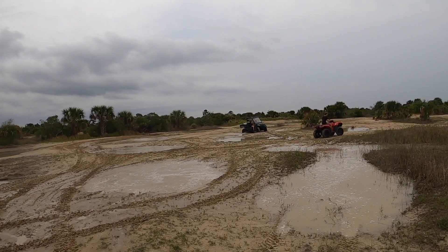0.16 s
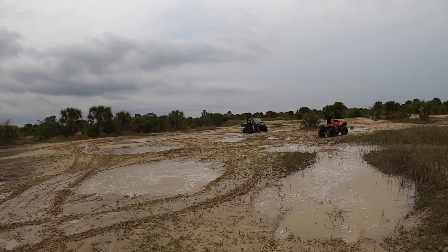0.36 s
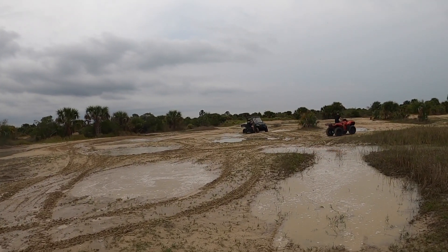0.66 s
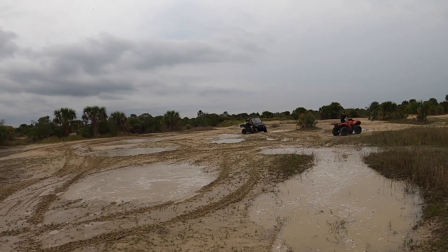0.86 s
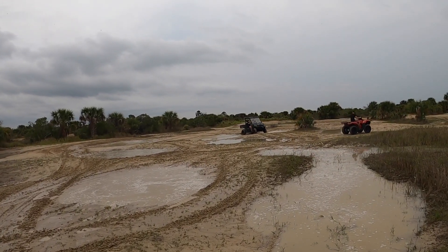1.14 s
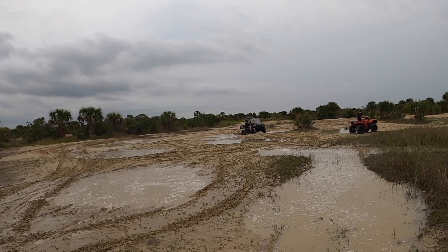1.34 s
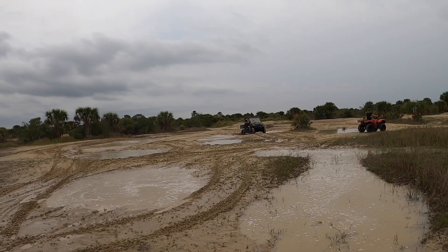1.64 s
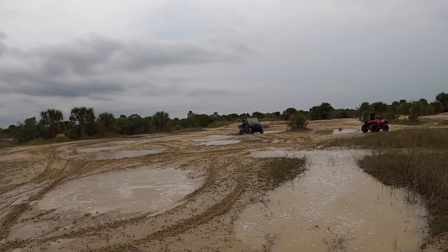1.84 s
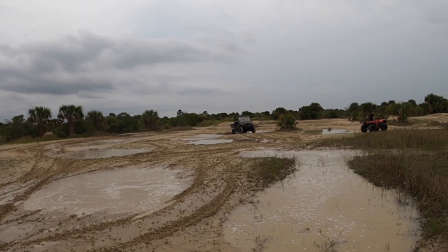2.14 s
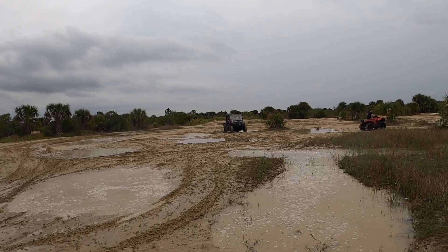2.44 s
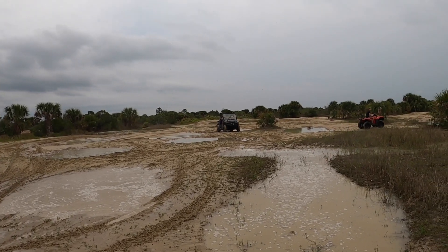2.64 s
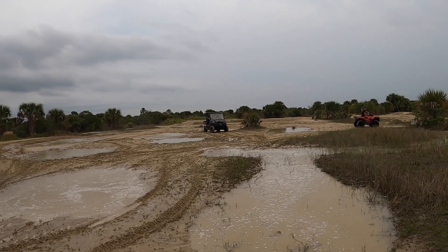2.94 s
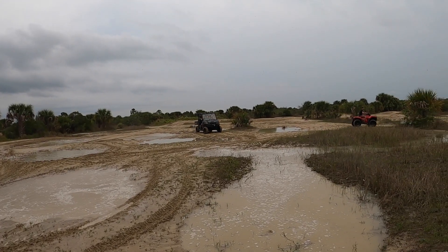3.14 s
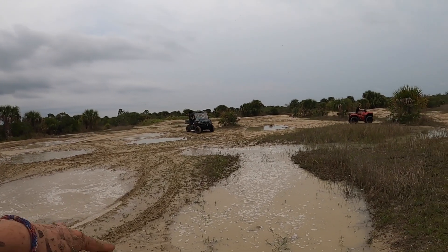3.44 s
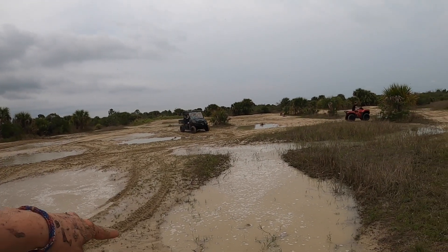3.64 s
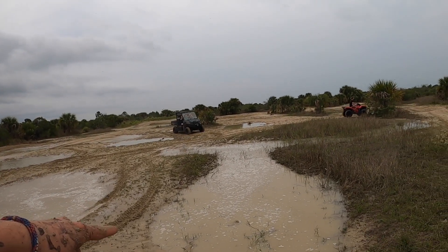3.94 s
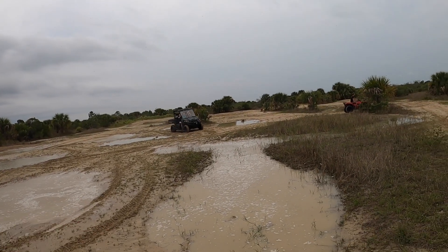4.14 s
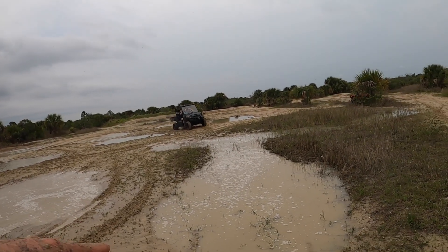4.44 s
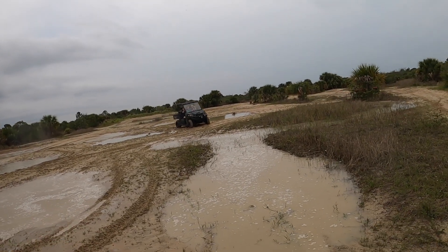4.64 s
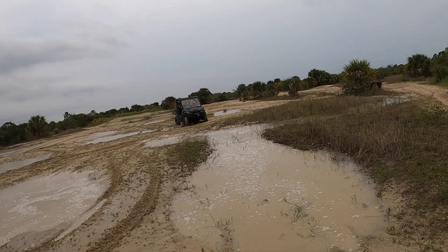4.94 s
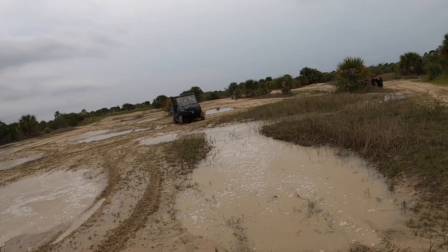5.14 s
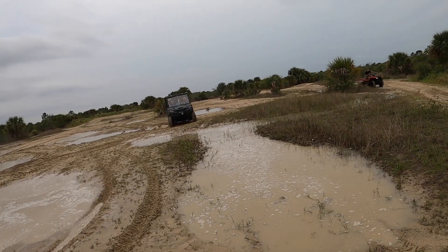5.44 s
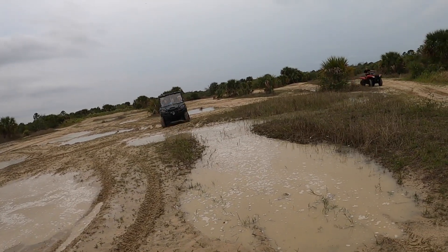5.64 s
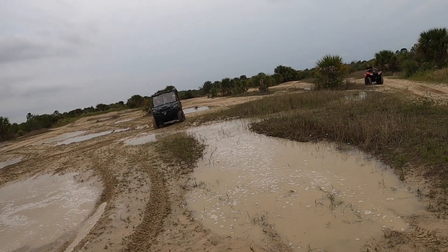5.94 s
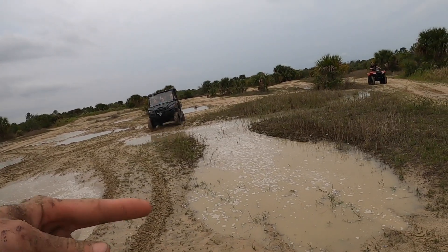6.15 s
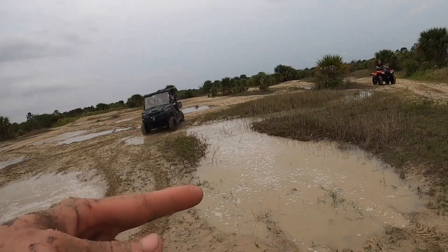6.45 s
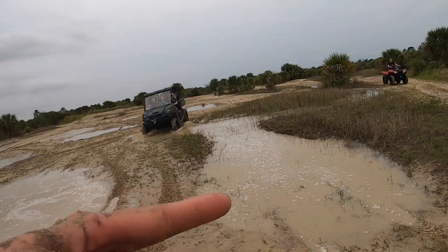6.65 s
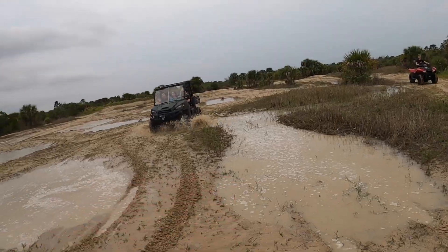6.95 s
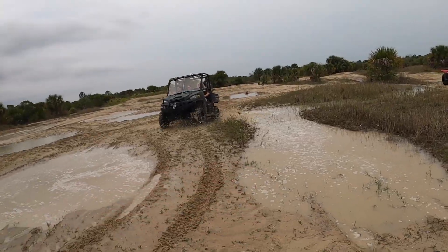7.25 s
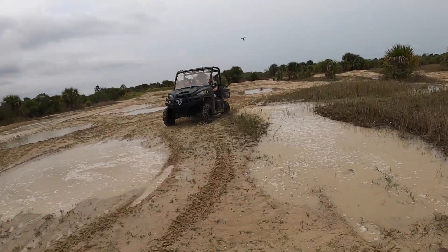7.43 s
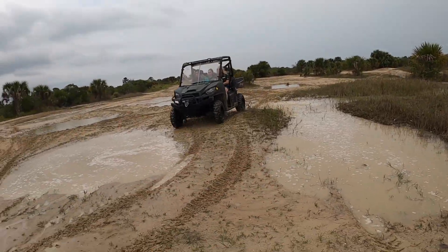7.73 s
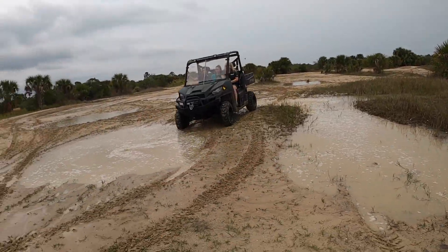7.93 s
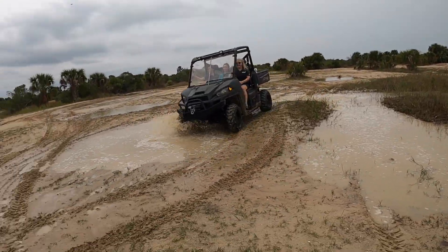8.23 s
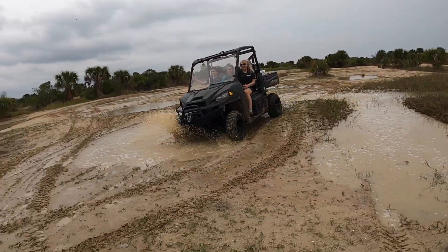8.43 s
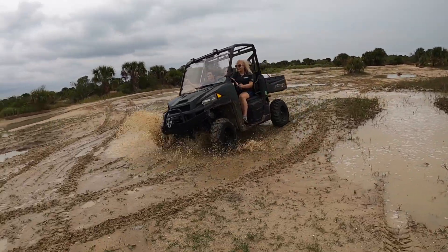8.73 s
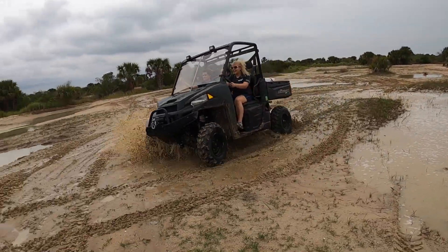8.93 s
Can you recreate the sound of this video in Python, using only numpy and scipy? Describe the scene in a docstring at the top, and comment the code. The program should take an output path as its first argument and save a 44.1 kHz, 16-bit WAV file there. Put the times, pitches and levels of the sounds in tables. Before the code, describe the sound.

A quad chugs away over wet sand while a buggy engine revs up and down, drives in and splashes a puddle, wind buffeting.

```python
"""Two off-road vehicles on windy wet sand

A single-cylinder quad chuffs away while a twin-cylinder buggy revs closer and ploughs a puddle.
Firing pulses and gas noise excite pipe resonances; filtered noise gives intake roar, spray and wind.
Wind buffets, thumps and whistles at a small hand-held housing, and a few knocks ring its shell.
The housing filters the buggy and the quad's chuff; two microphone ports then hear the whole scene.
"""
import sys
import numpy as np
from scipy import signal
from scipy.fft import rfft, irfft
from scipy.io import wavfile
from scipy.ndimage import uniform_filter1d

SR = 44100
rng = np.random.default_rng(int(sys.argv[2]) if len(sys.argv) > 2 else 0)


def pcm_store(signal):
    """Save signal as 16-bit PCM."""
    levels = np.round(np.clip(np.atleast_2d(signal), -1, 1) * 32767)
    wavfile.write(sys.argv[1], SR, levels.astype(np.int16).T)


N = 400648
MARGIN = 4096  # samples of run-in and run-out for the filters
SIZE = N + 2 * MARGIN
TIME = np.arange(N) / SR  # s
BINS = np.arange(SIZE // 2 + 1) * SR / SIZE + 1e-9  # Hz, kept above zero for the logarithm


def quad():
    """Pulse excitation: regular firings boom in the silencer; a sharp, uneven chuff of gas follows each."""
    # engine speed: t/s, firing rate f/Hz
    firing_rate = [(0.0, 19.28), (0.38, 20.11), (0.6, 24.47), (1.1, 26.84), (1.45, 24.74), (1.95, 23.77),
                   (2.13, 20.73), (2.4, 26.38), (2.55, 25.04), (2.85, 27.02), (3.22, 19.54), (3.45, 19.22),
                   (3.62, 22.79), (4.0, 23.15), (4.35, 27.02), (4.7, 27.56), (5.35, 37.12), (5.85, 40.27),
                   (6.3, 29.32), (6.95, 25.35), (7.3, 27.53), (7.65, 21.94), (9.08, 23.05)]
    # quad as heard, the chuff loudest while its tail pipe points this way:
    # t/s, exhaust level/dB, chuff level/dB
    heard_level = [(0, -38, -68.5), (.5, -34.5, -52.5), (.8, -33.5, -52.5), (1.15, -36, -58.5),
                   (1.9, -38.5, -76), (2.12, -40.5, -61.5), (2.45, -37.5, -53.5), (3.05, -37.5, -57),
                   (3.33, -39.5, -54.5), (3.5, -41, -64), (3.8, -39, -56), (4.1, -36, -54.5),
                   (4.5, -41, -57.5), (5.5, -52, -71), (6.35, -33, -71.5), (6.9, -36.5, -71.5),
                   (7.7, -50.5, -79), (9.08, -33, -81)]
    # exhaust resonances: f/Hz, width/Hz, relative level/dB
    silencer_modes = [(95, 34, -3.5), (127.5, 26.8, 9), (202, 91, -9.5), (261, 41, -18), (393, 150, -24)]
    # tail pipe resonances in the chuff: f/Hz, width/Hz, relative level/dB
    chuff_modes = [(1054, 290, -3), (1480, 240, -4), (2460, 340, 5.5), (3150, 120, 7.5), (3665, 180, 19.5)]
    body_db, thinning_db_per_s = -15.5, 3.5  # lower part of the chuff, lost as the quad drives off

    pulses, phase, size = firing(curves(firing_rate)[0], .79, .003, .7)
    puff = size * (1 - np.exp(-phase / .035)) * np.exp(-phase / .16)  # rise and decay in cycles
    gas = air_noise()
    body = undb(body_db - thinning_db_per_s * TIME) * pipe(gas, chuff_modes)
    jet = band(band(gas, 4800., 9100.), 2600., 6400.)
    chuff = housing(puff * (jet + body))
    boom_db, chuff_db = curves(heard_level)
    return undb(boom_db) * unit(pipe(pulses, silencer_modes)) + undb(chuff_db) * unit(chuff)


def buggy():
    """Distance law: exhaust, main roar and spray follow load and gain 6 dB per halving of distance."""
    # engine: t/s, firing rate f/Hz, load level/dB
    engine = [(0, 28.66, -3.5), (.12, 29.16, -2), (.3, 29.4, -11.5), (.6, 30.7, -5.5), (.93, 31.55, -10),
              (1.31, 35.65, -12.5), (1.53, 39.26, -5), (1.74, 42.1, -5), (1.95, 51.05, 1.5),
              (2.1, 52.94, 4), (2.2, 50.9, -0.5), (2.45, 43.3, -3), (2.73, 34.36, -4.5),
              (3.06, 33.62, -12.5), (3.36, 29.7, -11), (3.55, 30.5, -10.5), (3.77, 34.7, -8.5),
              (4.05, 37.8, -7.5), (4.22, 40.9, -3), (4.47, 42.42, -5.5), (4.68, 40.9, -1.5),
              (4.86, 40.06, -10.5), (5.34, 37.54, -13), (5.7, 40.13, -13), (6.07, 41.48, -11.5),
              (6.45, 44.89, -6), (6.88, 43.64, -5), (7.05, 39.84, -10.5), (7.43, 35.02, -4),
              (7.66, 35.64, -20.5), (7.88, 32.24, -17), (8.04, 29.08, -21.5), (8.22, 30.04, -7),
              (8.5, 34.54, -5), (8.98, 39.25, -6), (9.08, 39.4, -13.5)]
    # circling far off, then driving in: t/s, distance/m
    path = [(0, 33.7), (2, 31.9), (3.3, 36), (5, 32.9), (6.4, 18.2), (7.6, 11.55), (8.3, 12.74),
            (9.08, 7.3)]
    second_turns, second_db = .24, -3  # second cylinder fires this share of a cycle after the first

    hz, load_db = curves(engine)
    near_db = 20 * np.log10(10 / curves(path)[0])  # relative to ten metres
    hiss_db = -45 + near_db + .33 * load_db
    pulses, phase, size = firing(hz, 0, .003, .8)
    second = np.diff(1. * (phase > second_turns), prepend=0).clip(0)
    pulses = pulses + undb(second_db) * size * second
    whine, roar = intake(hz, near_db + load_db, pulses, phase, size)
    return exhaust(pulses, near_db, load_db, hiss_db) + roar + whine + spray(hiss_db)


def exhaust(pulses, near_db, load_db, hiss_db):
    """Resonance: paired firings boom in the exhaust, bark in the tail pipe and ring the silencer shell."""
    # exhaust resonances: f/Hz, width/Hz, relative level/dB
    boom_modes = [(116, 89, 1), (187.4, 73, 5), (251, 58, 1.5), (308.5, 46.5, -1.5)]
    # swell above or below the load rule: t/s, low boom level/dB, tail pipe bark level/dB
    swell_table = [(0, 1, -16.5), (.9, -3.5, -4.5), (1.4, -11, 5), (2.1, 6, -1.5), (2.5, -11.5, 0.5),
                   (3.3, -1.5, -6), (3.9, 0.5, -2), (4.45, -5.5, 1.5), (4.9, 2.5, 2), (5.3, 2.5, 2.5),
                   (5.8, 0.5, -0.5), (6.5, 5.5, -2.5), (7, 2.5, -2), (7.7, -4, -16.5), (8.3, 3.5, -3),
                   (9, -2.5, 3.5)]
    # silencer shell's ring ahead of the housing: t/s, level/dB
    ring_level = [(0, -55), (.5, -70), (1.3, -56.5), (1.6, -53.5), (2.4, -53), (3, -49), (3.45, -56),
                  (3.8, -49), (4.7, -55), (5.3, -62), (5.9, -67.5), (6.35, -49), (7, -60), (7.43, -47),
                  (7.9, -56.5), (8.45, -44.5), (9.08, -58)]

    boom_swell_db, bark_swell_db = curves(swell_table)
    boom_db = -39 + near_db + .13 * load_db + boom_swell_db
    bark_db = -41.5 + near_db + .76 * load_db + bark_swell_db
    # mud and water roughen the exhaust, more so as the spray grows
    gas = unit(pulses) + (.1 + undb(hiss_db + 43)) * air_noise()
    rattle = undb(1.5 * walk(15)) * (gas + .3 * air_noise())  # the shell rings unevenly
    boom = undb(boom_db) * unit(pipe(pulses, boom_modes))
    bark = undb(bark_db) * unit(band(gas, 394, 574))
    ring = undb(curves(ring_level)[0]) * unit(band(rattle, 628, 690.7))
    return boom + bark + ring


def intake(hz, drive_db, pulses, phase, size):
    """Amplitude modulation: intake and belt noise swells with each cycle; gives whine and roar."""
    # lower note of the intake, ahead of the housing: t/s, level/dB
    throat_level = [(0, -55), (1.2, -63), (1.6, -56.5), (1.9, -41.5), (2.1, -45), (2.35, -51.5), (3, -64),
                    (6, -57.5), (6.6, -49), (7.5, -60), (9.08, -49)]
    # roar near 1.6 kHz, ahead of the housing: t/s, level/dB
    upper_level = [(0, -58.5), (2, -61), (3.6, -59.5), (5.5, -58.5), (6.7, -46), (7.4, -48), (7.9, -60.5),
                   (9.08, -43)]
    # raspy whine near 3 kHz, ahead of the housing: t/s, level/dB
    whine_level = [(0, -73), (2, -44.5), (3, -63.5), (5.8, -68.5), (6.25, -39), (7.3, -37.5), (7.7, -42),
                   (9.08, -43.5)]

    flow = (.7 + .4 * size * np.exp(-phase / .4)) * air_noise()
    flow = flow + .011 * hz * unit(pulses)
    main = undb(.5 * walk(22)) * band(flow, 1060., 1300.)
    roar = undb(-37.5 + drive_db) * unit(main)
    roar = roar + undb(curves(throat_level)[0]) * unit(band(flow, 995., 1085.7))
    roar = roar + undb(curves(upper_level)[0]) * unit(band(flow, 1382., 1678.))
    whine = undb(curves(whine_level)[0]) * unit(band(flow, 3070., 3300.))
    return whine, roar


def spray(hiss_db):
    """Random impacts: tyres throw sand and water, heard as noise with a scattered, spiky envelope."""
    puddle_s, rise_s, puddle_db = 9.05, .54, -1  # peak time, Gaussian width, level ahead of the housing

    flicker_db = .6 * walk(18) + 1.2 * walk(90)
    drops = undb(flicker_db + 2.2 * rng.exponential(size=(2, N))) * air_noise()
    hiss = undb(hiss_db + 6.5) * unit(band(drops, 1200., 6800.))
    # two body panels ring along with the spray
    panels = band(drops, 3070., 3250.) + 1.4 * band(drops, 4580., 4800.)
    hiss += undb(hiss_db + 8.5) * unit(panels)
    # the air eats the top of the spray until the buggy is near, so it grows more steeply
    sizzle = undb(1.515 * (hiss_db + 43.5) + 6.5) * unit(band(drops, 8190., 20130.))
    # fine droplets as the wheels plough the near puddle
    droplets = band(band(undb(1.5 * walk(30)) * drops, 9000., 13500.), 8500., 14000.)
    splash = np.exp(-((TIME - puddle_s) / rise_s) ** 2)
    return hiss + sizzle + undb(puddle_db) * splash * unit(droplets)


def knocks():
    """Modal decay: each tap cracks, then rings the stiff little shell for a few milliseconds."""
    # knocks on the housing: t/s, level/dB, treble share level/dB
    taps = [(3.388, -37, 2), (3.5996, -35, 5.5), (5.7385, -37.5, 4), (5.744, -34.5, 5), (7.72, -21.5, 6.5),
            (7.7313, -23.5, 2.5)]
    # shell modes: f/Hz, relative level/dB, time to fall 60 dB t/s
    shell_modes = [(313, -1, 0.037), (1016, 8.5, 0.013), (7300, -19, 0.0047)]

    out, t = np.zeros(N), TIME[:2048]
    for s, db, treble_db in taps:
        crack = band(band(rng.standard_normal(len(t)), 1500., 5500.), 600., 7000.)
        tap = undb(treble_db - 13) * unit(crack) * 1000 ** (-t / .018)
        for hz, mode_db, t60 in shell_modes:
            ring = np.sin(2 * np.pi * (hz * t + rng.random())) * 1000 ** (-t / t60)
            tap += undb(mode_db + treble_db * (hz > 2000)) * ring
        onset = np.minimum(t / .001, 1)
        first = int(s * SR)
        out[first:first + len(t)] += undb(db) * tap * onset
    return out


def whistle():
    """Cavity resonance: wind across a port sings a brief, wavering note that throbs quickly."""
    # the note: t/s, length/s, f/Hz, waver/Hz, level/dB
    note = (5.935, .18, 1150, 14, -35.5)
    throb_depth, throb_hz = .45, 49

    s, length, hz, waver_hz, db = note
    swell = np.exp(-(2 * (TIME - s) / length) ** 4) * undb(1.5 * walk(150))
    throb = 1 + throb_depth * np.cos(2 * np.pi * throb_hz * (TIME - s - .01))
    tone = np.sin(2 * np.pi * np.cumsum(hz + waver_hz * walk(80)) / SR)
    rush = .5 * unit(band(rng.standard_normal(N), .93 * hz, 1.07 * hz))  # air rushes with the tone
    return undb(db) * swell * (throb * unit(tone) + rush)


def gusts():
    """Turbulent noise: short swells of broad, rough hiss right at the ports."""
    # gusts that whistle past the ports: t/s at the centre, level/dB before roughening, length/s
    gust_table = [(0.011, -53, 0.098), (0.301, -52.5, 0.047), (0.961, -54, 0.066), (4.296, -50, 0.15),
                  (4.717, -48.5, 0.16), (4.743, -47, 0.033), (4.81, -48.5, 0.035), (5.202, -50.5, 0.11),
                  (5.28, -49.5, 0.17), (5.774, -52, 0.014), (5.832, -50.5, 0.06), (5.919, -43, 0.074),
                  (5.997, -46.5, 0.061), (6.07, -47.5, 0.056), (8.153, -45, 0.092)]

    swell = np.zeros(N)
    for s, db, length in gust_table:
        swell += undb(db) * np.exp(-np.abs(2 * (TIME - s) / length) ** 3)
    hiss = band(band(air_noise(), 320., 3600.), 300., 3900.)
    hiss = hiss - .69 * band(hiss, 1900., 2660.)  # the ports swallow this band
    return swell * undb(2. * walk(150) + 1.4 * walk(500)) * unit(hiss)


def wind():
    """Turbulent pressure: low eddies rock the whole housing in bursts; the sharpest are single thumps."""
    # spectrum of the eddies: f/Hz, relative level/dB
    rumble_spectrum = [(12, -1.5), (25, 2), (40, -1.5), (70, -11.5), (120, -16.5), (250, -31), (600, -42.5),
                       (1500, -99.5)]
    # eddies hitting the housing: t/s, push level/dB, time scale of the push t/ms
    thumps = [(0.199, -19.5, 5.6), (0.543, -29.5, 6.2), (0.928, -12, 16), (2.629, -22.5, 5),
              (3.561, -25, 2.7), (4.253, -20, 6), (4.7, -12.5, 4.8), (4.895, -21, 4.2), (5.271, -13, 5),
              (5.509, -21, 3.6), (5.655, -16, 3.4), (5.74, -20.5, 2.3), (5.826, -11.5, 3.7),
              (6.236, -15, 5.5), (7.297, -18, 3.6), (8.2, -9.5, 8.6), (8.22, -22.5, 3.8), (8.708, -17, 4.8)]

    eddies = irfft(rfft(rng.standard_normal(SIZE)) * undb(over_hz(rumble_spectrum)[0]), SIZE)[:N]
    out = unit(eddies * undb(2.26 * walk(25))) * buffeting()
    for s, db, ms in thumps:
        u = (TIME - s) * 1000 / ms - .8
        push = np.exp(-np.abs(4 * u) ** 1.5)
        suction = .82 * np.exp(-(1.9 * (u - 1.1)) ** 2)  # slower, after the push
        out += undb(db) * (push - suction)
    return out


def buffeting():
    """Power summation: the breeze, plus buffets that each rise and fall over a soft edge."""
    # steady wind on the housing: t/s, rumble level/dB
    breeze = [(0, -30), (1, -32), (2.4, -31.5), (3.4, -32.5), (4.6, -29), (6, -30), (7.5, -29),
              (9.08, -24.5)]
    # buffets of wind: start t/s, length/s, rumble level/dB added in power
    buffets = [(0.007, 0.042, -22), (0.201, 0.12, -24.5), (0.607, 0.071, -22), (0.836, 0.12, -23),
               (1.758, 0.036, -22), (2.481, 0.043, -21), (3.589, 0.074, -23), (4.149, 0.25, -20),
               (4.553, 0.29, -21), (5.005, 0.08, -28), (5.164, 0.27, -20), (5.492, 0.46, -23),
               (5.967, 0.068, -18.5), (6.233, 0.034, -27), (6.317, 0.12, -19.5), (6.958, 0.036, -20),
               (7.124, 0.33, -21), (7.491, 0.09, -20.5), (7.649, 0.03, -18), (7.682, 0.28, -20.5),
               (8.055, 0.189, -26), (8.492, 0.054, -26.5), (8.731, 0.34, -20)]
    edge_s = .032

    power = undb(curves(breeze)[0]) ** 2
    for s, length, db in buffets:
        inside = np.minimum(TIME - s, s + length - TIME) / edge_s
        power = power + (undb(db) * np.clip(.5 + inside / 2, 0, 1)) ** 2
    return np.sqrt(power)


def housing(x):
    """Minimum phase: a causal response with the housing's gain, from its folded cepstrum."""
    # housing between air and microphones: f/Hz, gain level/dB
    housing_gain = [(600, 1), (810, -3.5), (1000, 2), (1120, 15.5), (1300, 0), (1700, -5), (2160, -16),
                    (2750, -17.5), (3150, -14.5), (3400, -18.5), (4400, -27.5), (4680, -20), (5100, -32.5),
                    (6040, -41.5), (8500, -66), (13000, -79.5)]

    cepstrum = irfft(np.log(undb(over_hz(housing_gain)[0])), SIZE)
    cepstrum[1:SIZE // 2] *= 2
    cepstrum[SIZE // 2 + 1:] = 0
    return irfft(rfft(x, SIZE) * np.exp(rfft(cepstrum)), SIZE)[:, :N]


def air_noise():
    """Incoherence: unrelated noises for the straight path and the path scattered by hand and ground."""
    return rng.standard_normal((2, N))


def firing(hz, start, jitter, scatter_db):
    """Periodic excitation: one uneven pulse a cycle; also the phase in the cycle and its pulse size."""
    turns = start + np.cumsum(hz) / SR + jitter * walk(12)
    cycle = np.maximum.accumulate(np.floor(turns)).astype(int).clip(0)
    size = undb(scatter_db * rng.standard_normal(N // 400))[cycle]
    pulses = np.diff(cycle, prepend=cycle[0]) * size
    return pulses, np.clip(turns - cycle, 0, 1), size


def pipe(x, modes):
    """Modal superposition: a sum of band-pass resonances of alternating sign."""
    out = 0
    for k, (hz, width, db) in enumerate(modes):
        out = out + (-1) ** k * undb(db) * band(x, hz - width / 2, hz + width / 2)
    return out


def band(x, lo_hz, hi_hz):
    """Linear filtering: a gentle Butterworth band-pass."""
    return signal.sosfilt(signal.butter(2, [lo_hz, hi_hz], "bandpass", fs=SR, output="sos"), x)


def walk(rate):
    """Smoothed randomness: levels held 1 / rate s, slewed twice and scaled to rms 1."""
    k = int(SR / rate)
    held = np.repeat(rng.standard_normal(N // k + 1), k)
    return unit(uniform_filter1d(uniform_filter1d(held, k), k)[:N])


def undb(db):
    """Logarithmic level: the amplitude gain of a level in dB."""
    return 10 ** (np.asarray(db) / 20)


def unit(x):
    """Normalisation: the signal scaled to rms 1."""
    return x / np.sqrt(np.mean(x ** 2))


def curves(table):
    """Linear interpolation: the columns of a time table, one value a sample."""
    s, *columns = np.transpose(table)
    return [np.interp(TIME, s, c) for c in columns]


def over_hz(table):
    """Interpolation over log frequency: the columns of a frequency table, one value a bin."""
    hz, *columns = np.transpose(table)
    return [np.interp(np.log(BINS), np.log(hz), c) for c in columns]


def scene():
    """Superposition: straight and scattered arrivals; wind and knocks act on the housing directly."""
    return quad() + housing(buggy()) + gusts() + wind() + whistle() + knocks()


def record(dry):
    """Interaural-style cues: ports differ in level, phase and likeness; loud peaks are rounded."""
    # the two ports: f/Hz, left minus right level/dB, left lead/rad, likeness (0-1)
    port_table = [(156, 1.4, -2, 0.96), (674, 5.5, 0.57, 1), (1030, 3, 0.55, 1), (1500, 5.5, -0.58, 1),
                  (1640, -5.5, 1.4, 0.9), (1930, 4.5, -0.5, 0), (2200, 11.5, -1.8, 0.3), (2800, 7, -1.5, 1),
                  (3400, 4, -2, 1), (4060, 7.5, -2, 0.5), (4630, -2.5, -3, 0.65), (5270, -7.5, -2, 0.76),
                  (6500, 2.5, -2, 1), (7450, 10.5, -1, 0.7), (11000, 4.5, -6, 0.4)]
    bass_lag_s = 9e-5  # the left port hears the bass this much later
    ceiling, top_hz = .6, 14200  # amplitude limit ahead of the low-pass, and its corner

    lean_db, lead, like = over_hz(port_table)
    treble = BINS > 400  # below this the ports hear only the straight arrival
    like = np.where(treble, np.clip(like, 0, 1), 1)
    faded = dry * np.minimum(TIME / .01, 1)
    padded = np.pad(faded, ((0, 0), (MARGIN, MARGIN)), "reflect", reflect_type="odd")
    straight, scattered = rfft(padded)
    phase = np.where(treble, lead, -2 * np.pi * BINS * bass_lag_s)
    right = (like * straight + np.sqrt(1 - like ** 2) * scattered) * np.exp(-1j * phase)
    ports = irfft(np.array([straight * undb(lean_db / 2), right * undb(-lean_db / 2)]), SIZE)
    rounded = ceiling * np.tanh(ports / ceiling)
    low_pass = signal.ellip(8, .2, 70, top_hz, fs=SR, output="sos")
    return signal.sosfilt(low_pass, rounded)[:, MARGIN:-MARGIN]


dry = scene()
out = record(dry)
pcm_store(out)
```